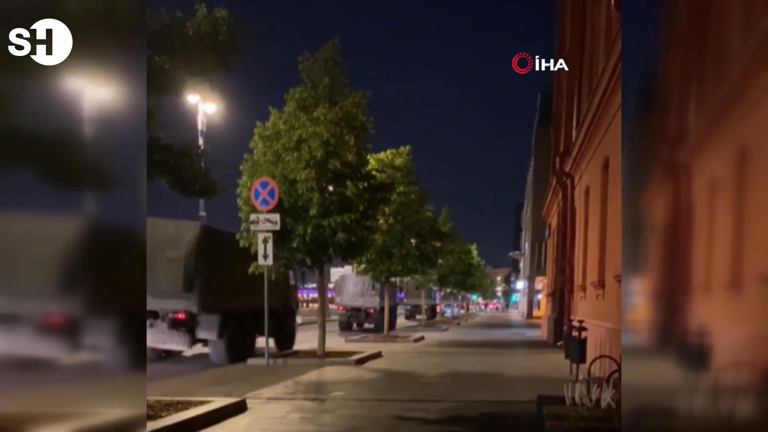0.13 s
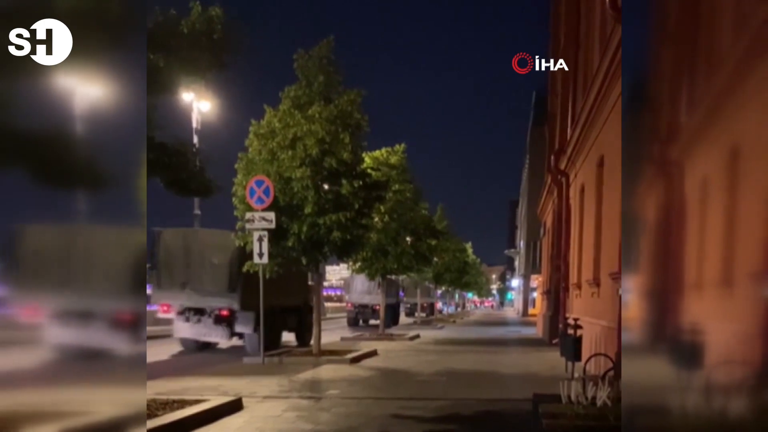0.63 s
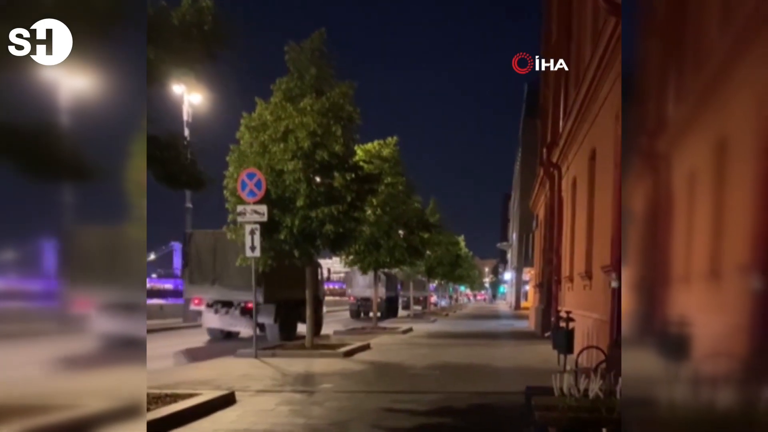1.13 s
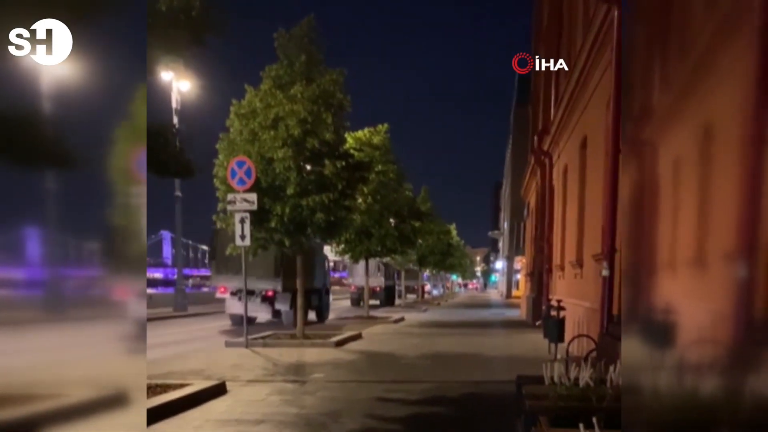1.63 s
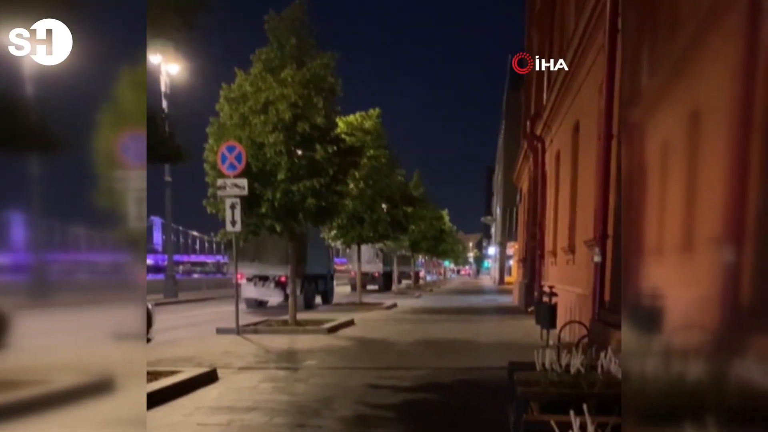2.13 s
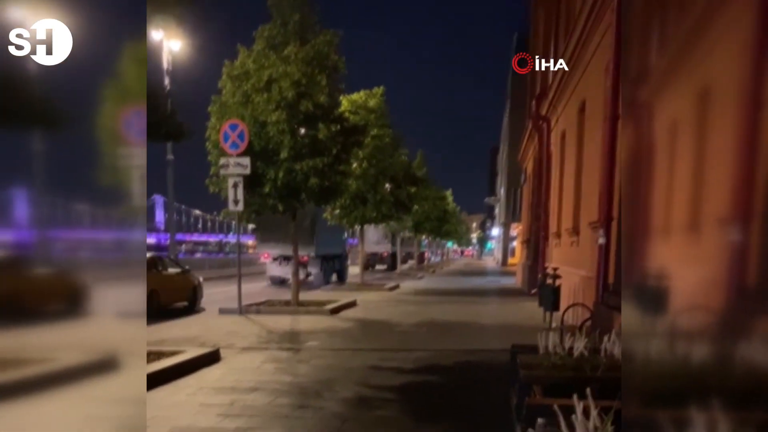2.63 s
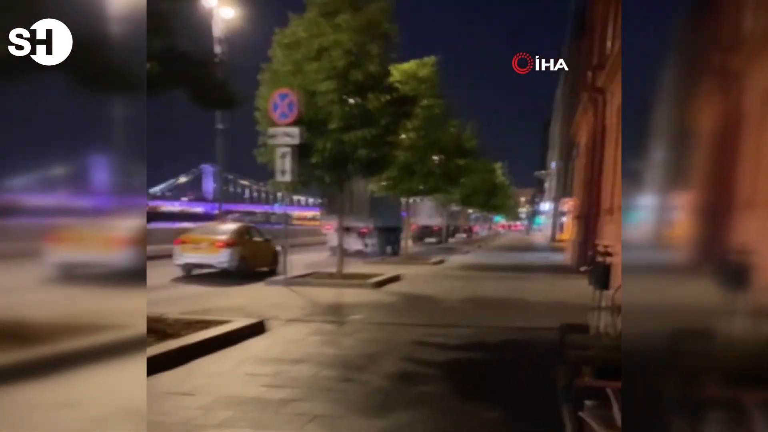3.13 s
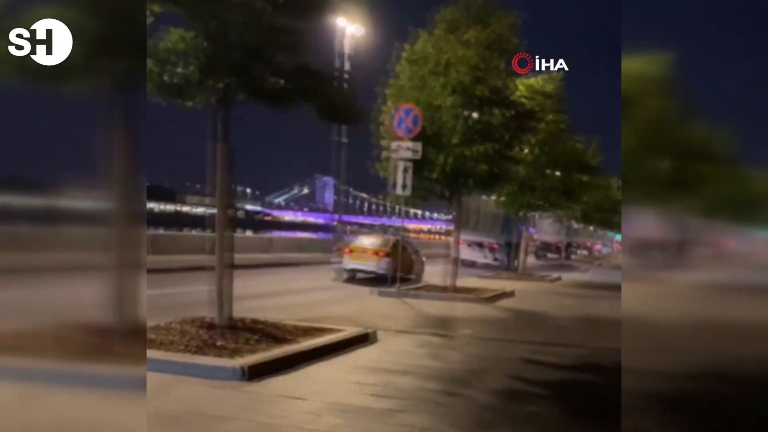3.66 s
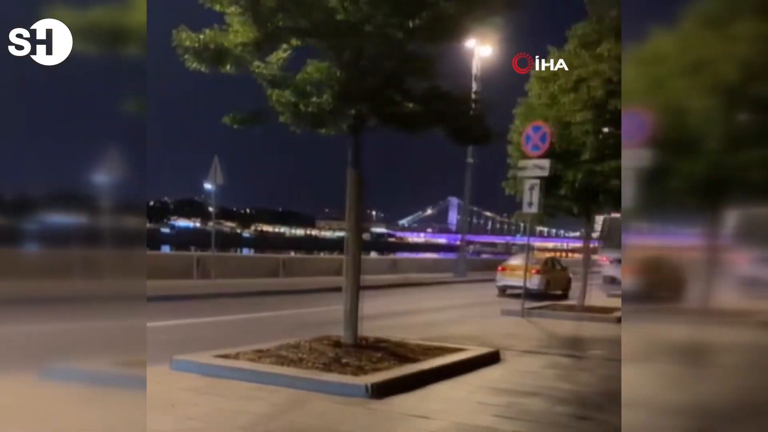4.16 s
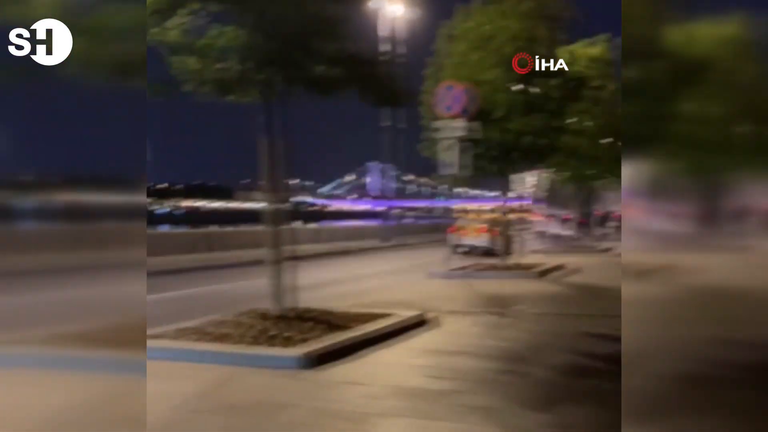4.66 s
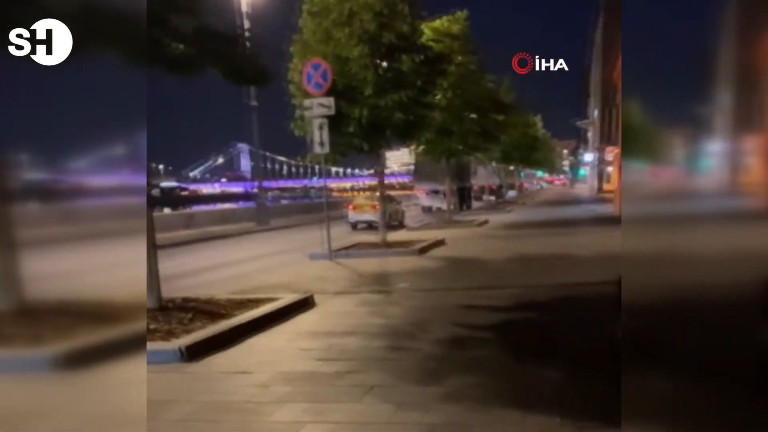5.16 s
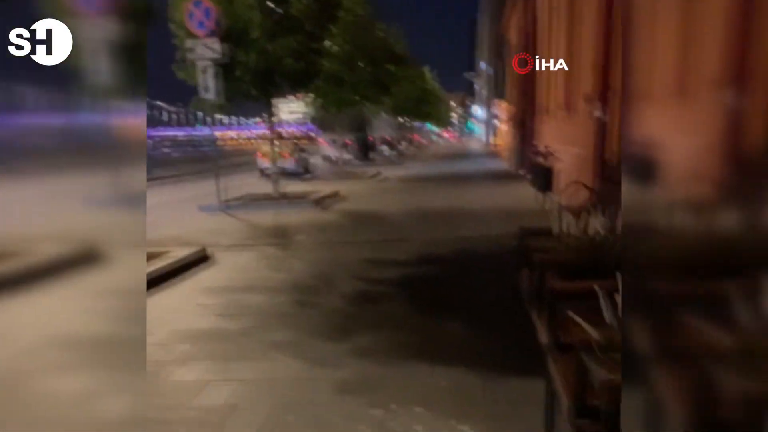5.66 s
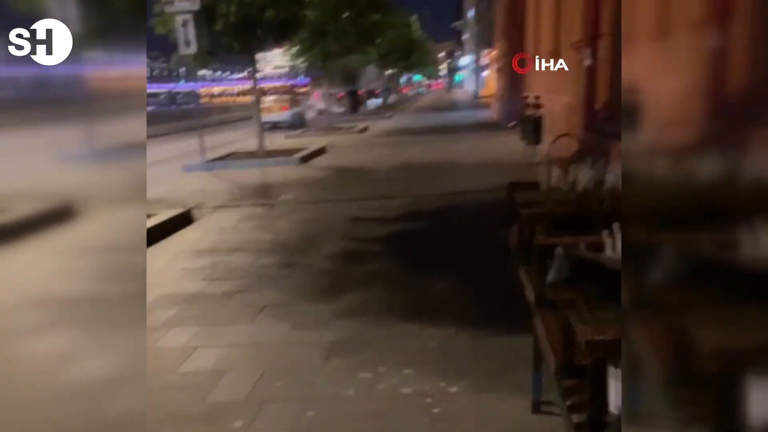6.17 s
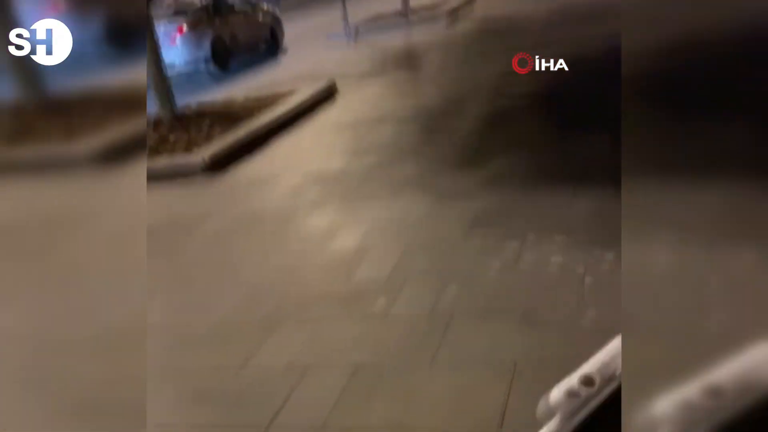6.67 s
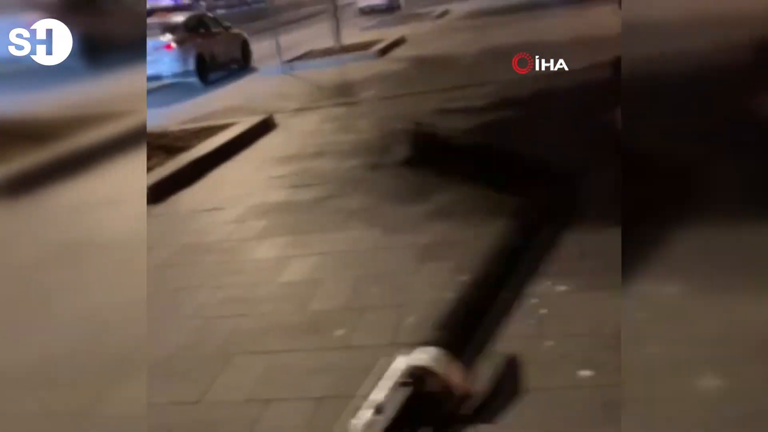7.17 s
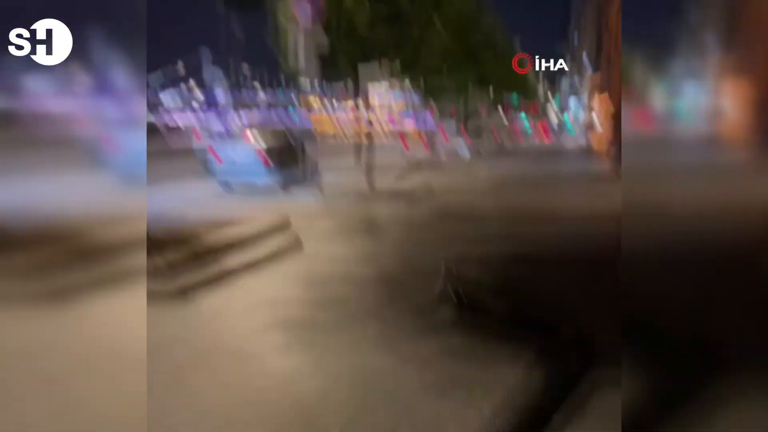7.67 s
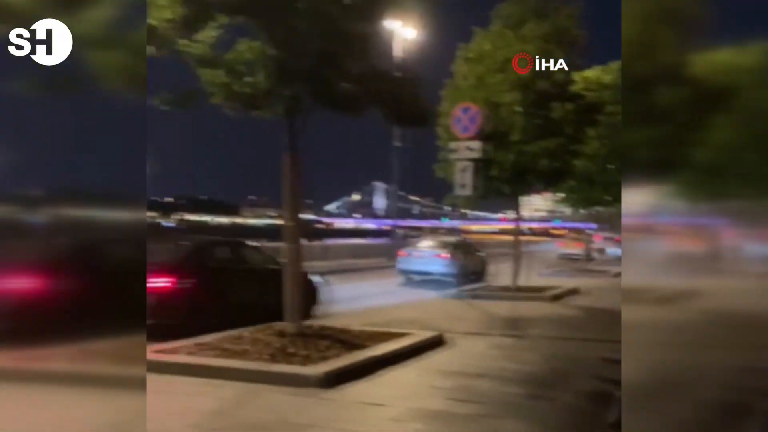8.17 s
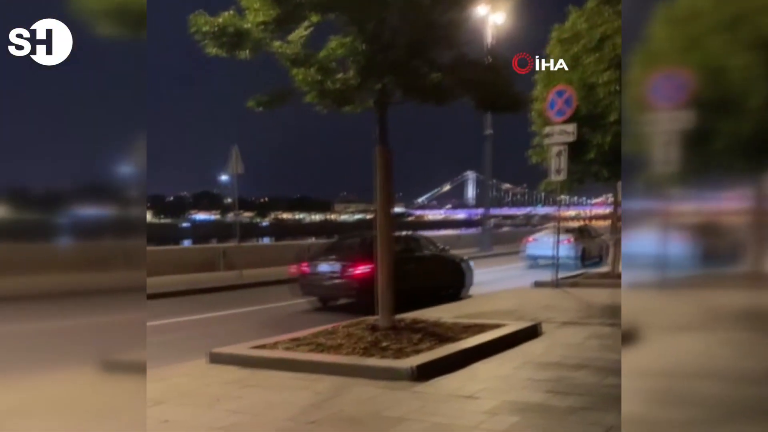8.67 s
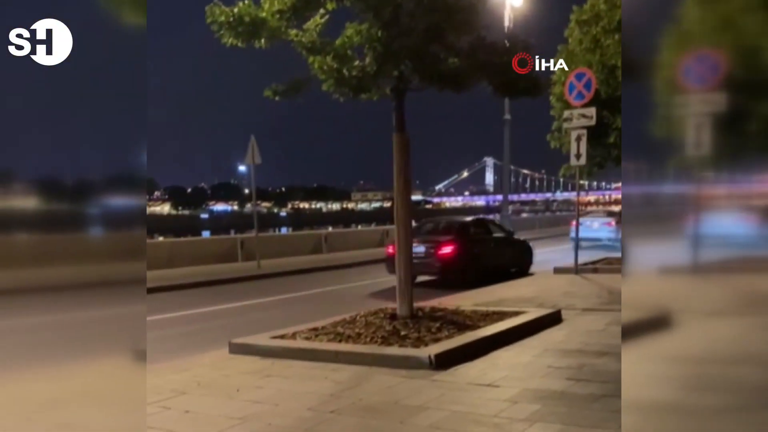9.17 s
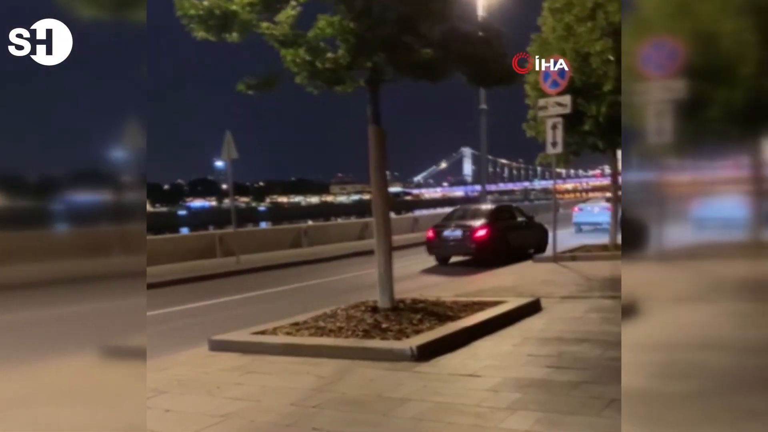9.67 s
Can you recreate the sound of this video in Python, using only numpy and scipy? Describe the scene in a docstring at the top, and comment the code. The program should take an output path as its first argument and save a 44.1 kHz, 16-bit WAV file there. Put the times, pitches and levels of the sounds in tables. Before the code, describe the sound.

Heavy diesel truck draws away on a night city street, idling engines rumble, then another vehicle growls up with swelling tyre roar and hiss.

```python
"""Heavy diesel trucks in a column on a wide street at night, heard from the pavement by a phone with two ports.
One comes up with body boom, tyre roar and hiss, and one draws away, its gears and casing ringing: coloured noises.
Engine drones, sines at multiples of wavering speeds, swell out of the roar; repeated engine cycles growl in it.
The idling column rumbles underneath as noise in a few pipe resonances, over the noise wash of the city."""
import sys
import numpy as np
from scipy import signal
from scipy.fft import rfft, irfft, next_fast_len
from scipy.io import wavfile
from scipy.ndimage import uniform_filter1d

SR = 44100
rng = np.random.default_rng(int(sys.argv[2]) if len(sys.argv) > 2 else 0)


def volts_from_db(level):
    """Convert decibel levels to linear amplitude ratios."""
    exponent = np.asarray(level, float) / 20
    return 10 ** exponent


def unload_wav(signal):
    """Save mono or channel-first audio to the path in sys.argv[1] as 16-bit WAV at rate SR, clipped to [-1, 1]."""
    wavfile.write(
        sys.argv[1],
        SR,
        np.round(np.clip(np.atleast_2d(signal).T, -1, 1) * 32767).astype(np.int16),
    )


N = 432621
T = np.arange(N) / SR
SIZE = next_fast_len(N)
HZ = np.arange(SIZE // 2 + 1) * SR / SIZE + 1e-3  # the offset keeps logarithms finite


def unit(x):
    """Normalisation: scale to rms 1."""
    return x / np.sqrt(np.mean(x ** 2))


def curves(table):
    """Envelopes: columns of a time table, linear between rows, one value a sample."""
    s, *columns = np.transpose(table)
    return [np.interp(T, s, column) for column in columns]


def across(table):
    """Spectra: columns of a frequency table, joined on a logarithmic axis."""
    hz, *columns = np.transpose(table)
    return [np.interp(np.log(HZ), np.log(hz), column) for column in columns]


def resonances(modes):
    """Resonance: gain over frequency of steep peaks, their powers added."""
    power = 0
    for hz, width, db in modes:
        detuning = (HZ - hz) / (width / 2)
        power = power + volts_from_db(db) ** 2 / width / (1 + detuning ** 2) ** 2
    return np.sqrt(power)


def noise(gain):
    """Incoherence: two unrelated noises of one colour, the direct sound and what the street scatters."""
    real, imaginary = rng.standard_normal((2, 2, len(HZ)))
    spectrum = (real + 1j * imaginary) * gain
    return unit(irfft(spectrum, SIZE)[:, :N])


def walk(rate):
    """Random modulation: levels held 1 / rate seconds and slewed twice, with a spread near 1."""
    k = 16  # points in each held level
    held = np.repeat(rng.standard_normal(int(N / SR * rate) + 2), k)
    slewed = 1.26 * uniform_filter1d(uniform_filter1d(held, k), k)
    return np.interp(T * rate * k, np.arange(len(slewed)), slewed)


def above(hz):
    """Crossover: a smooth share, near 1 well over the given frequency and near 0 well under it."""
    return 1 / (1 + (hz / HZ) ** 4)


# Levels of the truck coming up. Each row: time in seconds, body in dB, tyres in dB, air hiss in dB.
NEAR_LEVELS = [(4, -40, -52, -80.5), (5, -32, -52, -63), (6, -29, -32, -52.5), (6.5, -31, -31, -49),
               (7.4, -30, -28.5, -49.5), (7.9, -27.5, -26.5, -48.5), (8.8, -25, -22.5, -39.5),
               (9.4, -27, -21.5, -37), (9.81, -27, -19.5, -33.5)]
# Spectrum of its roar. Each row: frequency in Hz, relative density in dB per Hz.
NEAR_SPECTRUM = [(70, -6), (130, -0.5), (250, -6.5), (420, -15), (700, -9.5), (1100, -10.5), (1500, -20.5),
                 (2300, -27.5), (3200, -22), (4500, -28.5), (6000, -33), (7500, -32), (10000, -29.5),
                 (11500, -42.5)]
# Bands of its exhaust boom. Each row: centre in Hz, width in Hz, relative power in dB.
BOOM_BANDS = [(302.6, 60, -4.5), (247, 23, -11), (807, 68, -8.5)]
# Swell of the boom. Each row: time in seconds, level in dB.
BOOM_LEVELS = [(4.3, -43.5), (5.4, -32), (6.4, -31.5), (6.75, -31.5), (7.1, -31.5), (9, -45.5)]


def truck_near():
    """Amplitude modulation: firings throb in the body, tyre and hiss bands; a breathy exhaust boom joins them."""
    body_top_hz, tyre_top_hz = 383, 2150
    firing_hz, firing_depth = 99.1, 0.036
    colour = volts_from_db(across(NEAR_SPECTRUM)[0]) * above(70.)
    low, high = above(body_top_hz), above(tyre_top_hz)
    bands = np.sqrt(1 - low), np.sqrt(low * (1 - high)), np.sqrt(high)
    firing_rate = firing_hz * (1 + 0.018 * walk(5))
    throb = 1 + firing_depth * np.cos(2 * np.pi * np.cumsum(firing_rate) / SR)
    out = noise(resonances(BOOM_BANDS)) * volts_from_db(curves(BOOM_LEVELS)[0])
    for band, db in zip(bands, curves(NEAR_LEVELS)):
        out = out + noise(colour * band) * throb * volts_from_db(db + 0.56 * walk(2.066))
    return out


# Levels of the truck drawing away. Each row: time in seconds, roar in dB, ringing in dB.
AWAY_LEVELS = [(0, -28.5, -34), (1.5, -34.5, -37.5), (3, -38.5, -40.5), (3.5, -57, -43), (4.2, -62, -45.5),
               (4.8, -52, -44.5), (6.5, -59.5, -49.5)]
# Spectrum of its roar. Each row: frequency in Hz, relative density in dB per Hz.
AWAY_SPECTRUM = [(130, -26.5), (250, -15), (420, -15.5), (700, -27.5), (1100, -25), (1400, -26.5),
                 (1800, -25.5), (2300, -33), (3200, -29), (4500, -32), (6000, -33.5), (7500, -44),
                 (10000, -50.5), (11500, -49)]
# Ringing of gears and casing. Each row: centre in Hz, width in Hz, relative power in dB.
RING_BANDS = [(445, 36, -8.5), (822, 90, 1), (2128, 150, -3), (3540, 260, -6.5), (3770, 300, -8),
              (6560, 480, -13.5)]


def truck_away():
    """Structural resonance: narrow bands where gears and casing ring stand beside a broad roar."""
    roar_db, ring_db = curves(AWAY_LEVELS)
    roar = noise(volts_from_db(across(AWAY_SPECTRUM)[0]) * above(130.0)) * volts_from_db(roar_db)
    ringing = noise(resonances(RING_BANDS)) * volts_from_db(ring_db + 0.53 * walk(7.6))
    return roar + ringing


# Engines: the truck drawing away and gathering speed, its gear whine and turbo whistle, a truck cruising
# further down the column, an engine revving briefly, and the truck coming up. Each holds two tables.
# Each speed row: time in seconds, cycles a second in Hz.
# Each swell row: order as a multiple of the speed, peak time in seconds, half length in seconds, peak in dB.
ENGINE_ORDERS = [ ([(0, 13.3), (.6, 13.75), (1.1, 13.85), (2.4, 14.05)], [(5.007, 0.77, 1, -33),
                 (7.05, 0.28, 1.7, -30), (30, .2, 0.55, -39.5), (30.5, 1.15, 0.26, -38),
                 (30.8, 1.85, 0.26, -41.5), (34.9, 0.3, 0.42, -40.5), (34.94, 1.05, 0.53, -35),
                 (33.6, 0.8, 0.6, -42), (35.14, 1.9, 0.29, -38)]), ([(0, 2835), (1.5, 2990)],
                 [(1, .5, 1., -51.5), (3.6, .15, 0.62, -52)]), ([(.2, 213.7), (1.2, 215.5), (2, 211.3),
                 (3.6, 214)], [(1, 0.8, 0.96, -36.5), (1, 2.2, 0.85, -34.5), (1, 3.2, 0.57, -34)]),
                 ([(3.2, 163.8), (5.2, 174.6)], [(1, 3.69, 0.71, -37.5), (1, 4.71, 0.42, -32)]),
                 ([(2.8, 13.4), (4, 12.2), (5.4, 12.02), (6.7, 12), (8.3, 11.96), (9.3, 12.26),
                 (9.81, 11.9)], [(3.01, 9, 1.8, -34.5), (3.986, 6.9, 0.89, -32), (5.01, 7.9, 1.2, -25),
                 (8.026, 3.95, 1.6, -34), (8.064, 6, 1.28, -29.5), (7.988, 7.32, 1.26, -24.5),
                 (4.996, 6.35, 0.3, -25.5), (4.99, 8.94, 0.51, -28), (7.99, 9.5, 0.4, -24.5),
                 (10.13, 9.6, .6, -30), (13, 7.08, 0.46, -34), (13.07, 8.1, 0.57, -29.5),
                 (13.03, 8.98, 0.74, -23.5), (13.02, 9.85, 0.66, -23), (17.99, 5.54, 0.5, -36),
                 (17.96, 7.4, 1.48, -30.5), (18.03, 9.4, 1.0, -37), (24.07, 6.75, 0.17, -29.5),
                 (85.3, 8.7, .25, -42), (97.5, 7.8, 0.68, -41.5)]), ]


def drones():
    """Harmonic orders: sines tied to engine speed stand clear of the roar; speed and echoes make them waver."""
    swell_drop_db = 16.5  # below the peak at half a length away
    swell_edge = 2.4  # steepness: 2 is a bell, more a plateau
    breath, breath_per_s = 0.34, 22  # share and rate of the flutter that widens each order
    out = np.zeros((2, N))
    for speed, swells in ENGINE_ORDERS:
        cycles = np.cumsum(curves(speed)[0] * (1 + 0.0016 * walk(9))) / SR
        # the scattered copy slips in phase against the direct one
        slip = np.array([0 * T, 4.93 * walk(1.8)])
        for order, peak_s, half_s, db in swells:
            on = slice(int(max(peak_s - 2 * half_s, 0) * SR), int((peak_s + 2 * half_s) * SR))
            fall_db = swell_drop_db * np.abs((T[on] - peak_s) / half_s) ** swell_edge
            gain = volts_from_db(db - fall_db + 0.6 * walk(12)[on])
            phase = 2 * np.pi * order * cycles[on] + slip[:, on] + order
            in_phase = walk(breath_per_s)[on] * np.sin(phase)
            quadrature = walk(breath_per_s)[on] * np.cos(phase)
            flutter = breath * (in_phase + quadrature)
            out[:, on] += np.sqrt(2) * (np.sin(phase) + flutter) * gain
    return out


def growl(speed, roar_db):
    """Periodicity: uneven cylinders give one cycle of many orders, repeated at a wavering speed."""
    under_roar_db, scatter_db, tilt_db_per_octave = -9, 3, -5
    order = np.arange(4, 130)
    deviation, turn = rng.standard_normal(len(order)), rng.random(len(order))
    place = np.linspace(0, 1, 2049)  # position within the cycle
    order_gain = volts_from_db(scatter_db * deviation + tilt_db_per_octave * np.log2(order))
    cycle = order_gain @ np.sin(2 * np.pi * (np.outer(order, place) + turn[:, None]))
    cycles = np.cumsum(curves(speed)[0] * (1 + 0.00398 * walk(6))) / SR
    # the scattered copy runs a varying part of a cycle late
    late = np.array([0 * T, .3 + 0.038 * walk(3.4)])
    return np.interp((cycles - late) % 1, place, unit(cycle)) * volts_from_db(roar_db + under_roar_db)


# Level of the idling column. Each row: time in seconds, level in dB.
RUMBLE_LEVELS = [(0, -20.5), (1.1, -20), (1.5, -23), (2.8, -19.5), (3.15, -22.5), (3.45, -19), (3.7, -34.5),
                 (3.85, -19), (4.2, -24.5), (4.8, -21.5), (5.6, -21), (7.1, -25.5), (8.2, -22.5), (9, -21),
                 (9.81, -21.5)]
# Its exhaust resonances. Each row: centre in Hz, width in Hz, relative power in dB.
PIPE_BANDS = [(48.6, 17, 1.5), (60.7, 18.4, 1), (83, 17, -6)]


def rumble():
    """Beating: slow exhausts in a few pipe resonances wander in pitch and throb in level."""
    pipes = noise(resonances(PIPE_BANDS))
    envelope = np.abs(signal.hilbert(pipes, SIZE)[:, :N])
    # levelling, as of a recorder's gain control, partly evens the throb
    even = pipes / (envelope + 0.22) ** 0.22
    band = above(33.0) * (1 - above(110.))
    return unit(irfft(rfft(even, SIZE) * band, SIZE)[:, :N]) * volts_from_db(curves(RUMBLE_LEVELS)[0])


# Spectrum of far traffic. Each row: frequency in Hz, relative density in dB per Hz.
CITY_SPECTRUM = [(70, -4), (130, -12), (250, -14.5), (420, -17.5), (700, -18.5), (1100, -21.5), (1400, -26),
                 (1800, -33.5), (2300, -33), (3200, -40.5), (4500, -41.5), (6000, -45.5), (7500, -51),
                 (10000, -62.5), (11500, -61)]


def city():
    """Diffuse sound: far traffic is a smooth wash whose lower part swells against steady treble."""
    low_db, high_db = -25.5, -42.0
    colour, high = volts_from_db(across(CITY_SPECTRUM)[0]) * above(63.4), above(2530.0)
    wash = noise(colour * np.sqrt(1 - high)) * volts_from_db(low_db + 0.2 * walk(2.7))
    return wash + noise(colour * np.sqrt(high)) * volts_from_db(high_db)


# Interference patches. Each row: rms depth in dB, smoothing width in Hz, smoothing length in seconds.
INTERFERENCE = [(2.5, 25., .1), (0.9, 400, .03)]


def patchy(x):
    """Interference: echoes from fronts, road and trucks make patches of the roar swell and fade."""
    z = signal.stft(x, nperseg=2048, noverlap=1536)[2]
    # long waves bend round obstacles and stay even; full depth is reached at 770 Hz
    depth = np.minimum(np.arange(z.shape[1]) * SR / 2048 / 770.0, 1)[:, None]
    for db, hz, s in INTERFERENCE:
        field = rng.standard_normal(z.shape[1:])
        spans = int(hz * 2048 / SR) + 1, int(s * SR / 512) + 1  # in bins and frames
        for axis, span in enumerate(spans):
            field = uniform_filter1d(uniform_filter1d(field, span, axis=axis), span, axis=axis)
        z = z * unit(volts_from_db(db * depth * unit(field)))
    return signal.istft(z, nperseg=2048, noverlap=1536)[1][:, :N]


# Stereo image by frequency. Each row: frequency in Hz, left-right phase in radians,
# balance towards the right in dB, likeness of the channels from 0 to 1.
STEREO_IMAGE = [(166, 0.5, -1, 1), (320, 1, 4, 0.87), (488, 2, 5, 0.64), (740, 3.5, 3.5, 0.89),
                (1103, 3.5, -0.5, 0.85), (1595, 4.5, 1.5, 0.17), (2200, 5, -0.5, 0.7), (2530, 4, 2, 0.34),
                (4250, 4.5, 1, 0.7), (4600, 3.5, -0.5, 1), (5000, 4.5, 0.5, 1), (5170, -0.15, 0.5, 0.5),
                (5650, 0.27, 1, 0.89), (6800, -0.5, -0.5, 1), (7700, 1.2, 1.5, 0), (7930, -2, -0.5, 0.2),
                (9120, -2.5, -1.5, 0.96), (11200, -3.5, 2.5, 1)]
# Scattered sound below the crossover, as the phone turns between street and house fronts.
# Each row: time in seconds, gain in dB.
SCATTER_LEVELS = [(0, 2.5), (2.3, 0), (2.7, -3), (3.2, 2), (4.3, -0.5), (4.95, -6.5), (5.3, -4),
                  (7.3, -0.5), (9.81, -0.5)]


def stereo(sound, phase):
    """Coherence: direct sound is alike in both channels, scattered sound opposed; phase and balance part them."""
    _, right_db, like = across(STEREO_IMAGE)
    like = np.clip(like, 0, 1)
    high = above(1700)  # higher sound scatters alike from every side
    direct, scattered = rfft(sound, SIZE)
    turning = rfft(sound[1] * volts_from_db(curves(SCATTER_LEVELS)[0]), SIZE)
    scattered = scattered * high + turning * (1 - high)
    mid = direct * np.sqrt((1 + like) / 2)
    side = scattered * np.sqrt((1 - like) / 2)
    turn = np.exp(.5j * phase) * volts_from_db(right_db / 2)
    return np.array([(mid + side) / turn, (mid - side) * turn])


# Sound from far down the street arrives at another angle.
# Each row: frequency in Hz, added left-right phase in radians.
FAR_ANGLE = [(500, 0.094), (860, 0.041), (1100, -0.27), (1400, -0.22), (1800, 0.1), (3000, -0.3),
             (4000, 0.2)]


def scene():
    """Superposition: near truck, rumble and drones share one image; the far street has added phase."""
    near = truck_near() + growl(ENGINE_ORDERS[-1][0], curves(NEAR_LEVELS)[0])
    far = truck_away() + growl(ENGINE_ORDERS[0][0], curves(AWAY_LEVELS)[0]) + city()
    near, far = patchy(np.vstack([near, far])).reshape(2, 2, N)
    phase = across(STEREO_IMAGE)[0]
    near_image = stereo(near + rumble() + drones(), phase)
    far_image = stereo(far, phase + across(FAR_ANGLE)[0])
    left, right = near_image + far_image
    # long waves reach both ports alike
    apart = (left - right) / 2 * above(206)
    return irfft((left + right) / 2 + np.array([apart, -apart]), SIZE)[:, :N]


def top_cut(x):
    """Nothing passes above the cut-off."""
    return signal.sosfilt(signal.butter(12, 10580, fs=SR, output="sos"), x)


def record(dry):
    """Transduction: the microphone loses the deepest bass and saturation rounds loud peaks."""
    bass_cut = signal.butter(2, 30., "high", fs=SR, output="sos")
    x = signal.sosfilt(bass_cut, dry)
    mix = np.tanh(.6 * x) / .6
    return top_cut(mix)


dry = scene()
out = record(dry)
unload_wav(out)
```